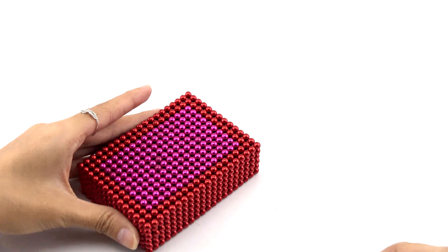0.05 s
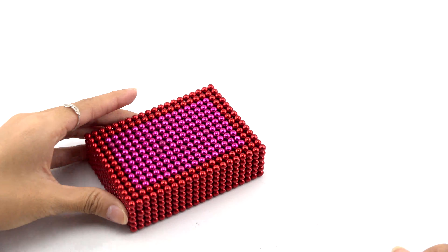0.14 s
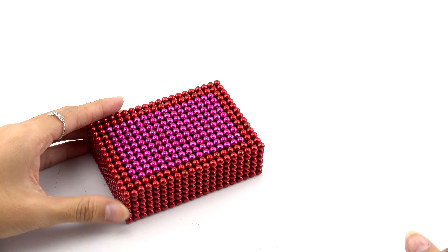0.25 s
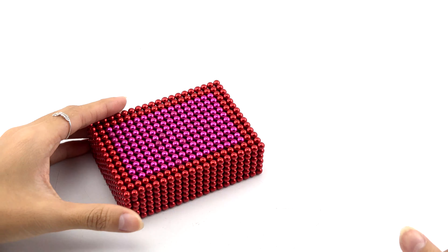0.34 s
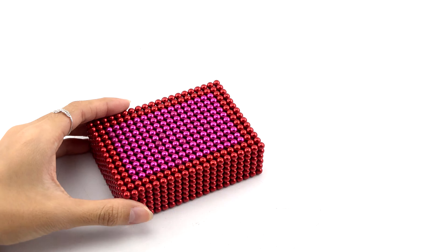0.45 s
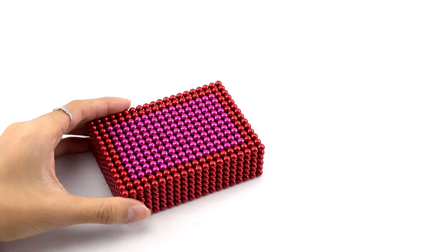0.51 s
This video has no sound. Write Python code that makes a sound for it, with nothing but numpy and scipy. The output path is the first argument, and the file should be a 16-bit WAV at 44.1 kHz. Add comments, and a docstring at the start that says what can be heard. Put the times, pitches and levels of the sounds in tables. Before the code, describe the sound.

Gritty sliding of many tiny steel magnets, then hard, bright clicks and dense snapping clatters, separated by quiet low room rumble.

```python
"""Magnet balls sliding and snapping

A hand slides a block of small steel magnet balls over a table: filtered contact noise plus a low table hum.
Then clusters of balls snap together as short ringing tones with a room tail, over rattling and rustling noise.
A small room rumbles as noise in narrow low modes, with faint air and whine; the loudest snaps overload the input.
"""
import sys
import numpy as np
from scipy import signal
from scipy.fft import rfft, irfft, next_fast_len
from scipy.io import wavfile
from scipy.ndimage import uniform_filter1d

SR = 44100
rng = np.random.default_rng(int(sys.argv[2]) if len(sys.argv) > 2 else 0)


def waveform_to_disk(signal):
    """Save audio, clipped to [-1, 1], as 16-bit WAV at the path in sys.argv[1]."""
    frames = np.transpose(np.atleast_2d(signal))
    scaled = np.clip(frames, -1, 1) * 32767
    samples = np.round(scaled).astype(np.int16)
    wavfile.write(sys.argv[1], SR, samples)


N = 257544

# single snaps of the cluster: start_s, clack_db, base_pitch_hz, upper_db and tick_db (both relative to the clack),
# base_ring_s (fall by 60 dB, scaled for each tone)
SNAPS = [(0.2947, -8.5, 1050, 0.5, -4.5, 0.0089), (0.2959, -3, 2550, -13, -7.5, 0.0057),
         (0.3358, -9, 1910, 2.5, -8.5, 0.0031), (0.5342, -7.5, 1700, -11, -15.5, .0048),
         (0.5658, -31, 2180, -4, 0, 0.0066), (0.6114, -25.5, 1690, -4, -14, .029),
         (0.6756, -43, 1950, 17.5, -19, 0.035), (1.251, -38, 1450, 14, 19.5, 0.061),
         (1.2591, -37.5, 1600, -7, 22.5, .015), (1.5218, -29, 1706, 11, -19.5, .012),
         (1.9209, -37.5, 2547, -6.5, -28.5, .0031), (2.208, -.5, 1544, -25.5, -70, 0.0058),
         (2.5839, -46.5, 1860, 3.5, 1.5, .0054), (2.6397, -41, 1580, -17, -26, .024),
         (2.657, -7.5, 1745, -12, -37, 0.014), (2.6716, -2.5, 1555, -6.5, -39, 0.023),
         (2.6799, -28.5, 1670, 7.5, -20, .036), (2.6959, 0.5, 2130, -15, -28, .015),
         (2.7227, -2.5, 1566, -13, -23, 0.02), (2.7282, 5.5, 2125, -17.5, -24, 0.0071),
         (2.733, -10, 2130, -11, -24, .012), (2.7685, -10, 2220, -18, -33.5, .013),
         (2.7761, -9, 1540, -4.5, -33, .058), (2.7796, 3.5, 2069, -22, -20, .012),
         (2.9471, -40, 2017, -14, -16.5, .0059), (2.9715, -27, 1530, -17.5, -30.5, .0042),
         (3.0078, -27, 1670, -14, -36, 0.015), (3.0308, -35.5, 1700, -9, -27.5, 0.018),
         (3.0548, -38.5, 1640, -19, -27.5, .024), (3.0864, -38, 1630, -16.5, -22.5, .005),
         (3.2227, -46.5, 1997, -8, -24, .009), (3.264, -36.5, 1630, -7, -16, 0.0049),
         (3.275, -29, 1940, -14.5, -27, 0.018), (3.2844, -2.5, 2470, -17, -34, 0.0041),
         (3.305, -18, 2000, -10.5, -21, 0.0054), (3.3109, -14.5, 2125, 0, -1.5, 0.037),
         (3.3163, 2, 2350, -4.5, -17, .006), (3.3512, -26.5, 2690, -5, -31, .017),
         (3.475, -42.5, 2550, -11, -29, 0.02), (3.5024, -29, 1090, -26.5, -19, .013),
         (3.5108, -29, 1141, -27, -27, .025), (3.99, -17, 2210, -14.5, -17.5, 0.0064),
         (3.992, -33, 1450, -4.5, -16, 0.022), (4.189, -21, 1350, -15, -18, 0.026),
         (4.1938, -19, 1275, -9.5, -15.5, .019), (4.2097, -13.5, 1075, 10, 3, 0.049),
         (4.222, -13, 1400, -1, -2.5, 0.056), (4.2399, -6.5, 1306, 7, -8.5, 0.031),
         (4.2605, -8.5, 1500, -11.5, -11.5, .027), (4.267, -5.5, 1535, -13, -21, .016),
         (4.563, -21, 1440, 12, -5, .03), (4.5696, -12.5, 1100, 10.5, 2, .015),
         (4.577, -10.5, 1290, -1.5, -11.5, 0.0033), (4.6043, -21, 1516, -3.5, -9.5, .012),
         (5.0863, -37, 997, -7, -5, .006), (5.6484, -15.5, 2651, -13.5, -44, .014),
         (5.6505, -23.5, 1350, -6, -49.5, .013), (5.7061, -42, 2455, 4.5, -29.5, .046)]


def gain_of(db):
    """Decibels to amplitude."""
    return 10 ** (np.asarray(db) / 20)


def evened(x):
    """Scales to rms 1."""
    return x / np.sqrt(np.mean(x ** 2) + 1e-20)


def peaked(x):
    """Scales to peak 1."""
    return x / np.abs(x).max()


def smoothed_noise(span):
    """Slow random curve, rms 1: noise averaged twice over a span in samples."""
    once = uniform_filter1d(rng.standard_normal(N), span)
    return evened(uniform_filter1d(once, span))


def read(points, hz):
    """Reads (frequency, value) points on a log-frequency axis."""
    f, value = np.transpose(points)
    return np.interp(np.log(hz + 1), np.log(f + 1), value)


def level(rows, order):
    """Gain curve from one dB column, fading out just beyond the rows."""
    s, db = np.asarray(rows)[:, 0], np.asarray(rows)[:, order]
    times = np.r_[s[0] - .004, s, s[-1] + .02]
    return gain_of(np.interp(np.arange(N) / SR, times, np.r_[-130, db, -130]))


def moves(rows, bend, pace):
    """One gain curve for each dB column: every row rises, holds and fades; bend above 1 rounds the shoulders."""
    rows = np.asarray(rows)
    t = np.arange(0, N + 16, 16) / SR  # a coarse grid is enough for slow curves
    s, rise, hold, fade = rows[:, :4, None].transpose(1, 0, 2)
    before = np.maximum(s - t, 0) / rise
    after = np.maximum(t - s - hold, 0) / fade
    curves = []
    for db, fade_factor in zip(rows[:, 4:].T, pace):
        shapes = gain_of(-60 * (before + after / fade_factor) ** bend)
        curves.append(np.interp(np.arange(N) / SR, t, gain_of(db) @ shapes))
    return curves


def coloured(x, points):
    """Shapes x by a spectrum, rms 1."""
    size = next_fast_len(N)
    shape = gain_of(read(points, np.fft.rfftfreq(size, 1 / SR)))
    return evened(irfft(rfft(x, size) * shape, size)[:N])


def band(x, hz, width, steady=0):
    """A resonance applied twice, rms 1; width is that of one pass in Hz, steady 0-1 evens out its swells."""
    pole = np.exp((2j * np.pi * hz - np.pi * width) / SR)
    z = signal.lfilter([1], [1, -2 * pole, pole ** 2], x + 1e-12)
    return evened((z / np.abs(z) ** steady).real)


def grains(per_s, spread_db, hiss, flutter_db):
    """Random tiny contacts of uneven size over a hiss, coming in clumps a few milliseconds long."""
    draw, size, sign = rng.random(N), rng.exponential(1, N), rng.standard_normal(N)
    clumps = gain_of(flutter_db * smoothed_noise(200))
    ticks = evened((draw < per_s / SR) * gain_of(spread_db * np.minimum(size, 4)) * sign)
    return clumps * (ticks + hiss * rng.standard_normal(N))


def stillness():
    """Faint air noise and a thin whine whose amplitude pulses at the buzz rate."""
    # air spectrum: frequency_hz, relative_level_db
    air_spectrum = [(160, -27), (280, -1.5), (420, -3.5), (551, -10), (1120, -9.5), (2060, -21.5),
                    (5600, -29), (9500, -34.5), (16000, -33)]
    air_db, whine_db = -68.5, -86  # air rms, whine carrier amplitude
    whine_hz, buzz_hz = 10002, 100
    t = np.arange(N) / SR
    whine = np.sin(2 * np.pi * whine_hz * t) * (1 + np.sin(2 * np.pi * buzz_hz * t))
    air = coloured(rng.standard_normal(N), air_spectrum)
    return gain_of(air_db) * air + gain_of(whine_db) * whine


def rumble():
    """Lumpy low noise gathered in the narrow modes of the room, with a few swells."""
    # low room sound over time: start_s, lowest_modes_db, middle_modes_db, upper_modes_db
    rumble_rows = [(0.0, -57, -45, -56.5), (0.21, -69, -30.5, -33.5), (0.31, -28.5, -32, -31),
                   (0.41, -49, -47.5, -64), (1.3, -59, -44.5, -62.5), (1.45, -51, -41, -43),
                   (1.76, -60, -53.5, -68.5), (2.15, -48.5, -56, -68), (2.23, -52, -40, -32),
                   (2.32, -67.5, -58.5, -62), (2.54, -60, -52, -66), (2.6, -29, -32.5, -59),
                   (2.67, -29.5, -24.5, -42), (4.03, -49.5, -36, -56.5), (4.2, -48, -30, -59),
                   (4.31, -53, -20, -35), (4.41, -66, -33.5, -58.5), (4.88, -42, -35.5, -71),
                   (5.02, -69, -27.5, -53.5), (5.32, -28.5, -30, -45.5), (5.82, -38, -30, -49),
                   (5.84, -40, -45, -46.5)]
    # room modes: pitch_hz, one_pass_width_hz, relative_level_db, rumble column that drives it
    mode_rows = [(26, 20, -12, 1), (58, 9, -2, 1), (117, 12, -3.5, 2), (151, 26, -5, 2), (236, 9, -4, 3),
                 (255, 50, -4, 3)]
    # swells: full_at_s, rise_s, hold_s, fade_s (60 dB each way), deep_sway_db, middle_modes_db
    sway_rows = [(.02, .1, 0.018, 0.16, -61, -35), (.31, .03, .02, .25, -36, -36),
                 (.73, 0.093, .03, .2, -70, -37), (.84, .1, 0.051, 0.28, -69, -36.5),
                 (1.24, .2, .04, 0.23, -75, -40), (2.4, .1, 0.028, 0.18, -70, -42.5),
                 (2.59, .03, 0.011, .2, -36.5, -40), (3.07, 0.11, 0.077, .3, -49.5, -29.5),
                 (3.55, .15, .1, .4, -48, -33), (4.6, .1, 0.027, .3, -55, -33),
                 (5.34, 0.21, .01, .12, -22, -45), (5.46, .15, .02, 0.16, -21, -39.5),
                 (5.61, .1, .01, .3, -32, -35.5), (5.78, 0.093, 0.025, .12, -50, -25)]
    lumps_db, lump_s = 2.2, .06  # rms unevenness, averaging span
    sway_hz, sway_width_hz = 26, 20

    deep, middle = moves(sway_rows, 1.3, [1, 1])
    drive = {order: level(rumble_rows, order) for order in (1, 2, 3)}
    drive[2] = drive[2] + middle
    out = deep * band(rng.standard_normal(N), sway_hz, sway_width_hz, 0.5)
    for hz, width, db, order in mode_rows:
        lumps = evened(gain_of(lumps_db * smoothed_noise(round(lump_s * SR))))
        out += gain_of(db) * drive[order] * lumps * band(rng.standard_normal(N), hz, width, 0.13)
    return out


def lingering():
    """A faint cluster of tones, narrow bands of noise, hangs on between the pushes."""
    # rings of the block: pitch_hz, one_pass_width_hz, relative_level_db
    block_rings = [(2465, 40, -9), (2747, 20, -3), (3001, 14, 0), (3091, 30, -3), (3430, 14, -1),
                   (3050, 600, -2)]
    # two stretches of ringing, each: start_s, level_db
    stretches = [
        [(0.34, -42), (0.426, -55.5), (0.52, -51), (0.535, -33)],
        [(0.96, -51), (0.988, -58), (1.118, -71), (1.17, -63)],
    ]
    tones = sum(gain_of(db) * band(rng.standard_normal(N), hz, width, .3) for hz, width, db in block_rings)
    return sum(level(rows, order=1) for rows in stretches) * evened(tones)


def pings():
    """Two faint metallic pings, each a pair of decaying sine tones."""
    # pings: start_s, level_db
    ping_rows = [(3.5, -73), (5.087, -68.5)]
    # tones of a ping: pitch_hz, relative_level_db, ring_s (fall by 60 dB)
    ping_tones = [(4560, -0.5, 0.57), (7860, 5.5, 0.42)]
    t = np.arange(N) / SR
    out = np.zeros(N)
    for s, db in ping_rows:
        for hz, tone_db, ring_s in ping_tones:
            decay = (t > s) * gain_of(db + tone_db - 60 * np.maximum(t - s, 0) / ring_s)
            out += decay * np.sin(2 * np.pi * hz * t)
    return out


def table_hum():
    """The table top's low modes under rubbing, as narrow noise bands, rms 1."""
    modes = [(374, 55, 1), (320, 150, 0.53), (492, 240, 0.32)]  # pitch_hz, one_pass_width_hz, relative amplitude
    return evened(sum(g * band(rng.standard_normal(N), hz, width, .3) for hz, width, g in modes))


def slides():
    """Many balls skate over the table top at once and shake it: contact noise in three colours over the hum."""
    # pushes of the block: full_at_s, rise_s, hold_s, base_fade_s (rise and fade span 60 dB),
    # low_rub_db, scrape_db, fizz_db, table_hum_db
    push_rows = [(.028, 0.18, 0.0071, 0.28, -35.5, -31.5, -44, -51.5),
                 (.18, .2, .055, .15, -31, -25, -33, -21), (.27, .08, .015, .1, -31, -30, -39, -36),
                 (.33, 0.088, 0.027, 0.13, -45, -51, -48, -55),
                 (.537, 0.0098, 0.0019, 0.057, -24.5, -26, -31.5, -44),
                 (.555, 0.035, 0.0035, 0.19, -36, -44.5, -42.5, -36.5),
                 (.7, 0.45, .02, .35, -49.5, -42, -78, -51.5),
                 (.85, 0.28, 0.068, 0.16, -50.5, -39.5, -49.5, -49.5),
                 (1.2, 0.12, 0.027, 0.27, -42, -54, -51, -55),
                 (1.253, 0.062, 0.016, 0.19, -34.5, -47, -32, -54.5),
                 (1.42, 0.29, .11, 0.22, -41, -32, -51, -42),
                 (1.533, 0.089, 0.0037, 0.14, -48, -44.5, -56, -29.5)]
    # factors on the fade length, one for each of the four layers
    push_pace = [1.01, 0.98, .85, 1.05]
    # spectra of rub, scrape and fizz: frequency_hz, relative_level_db
    rub_spectrum = [(320, -45), (550, -20.5), (704, -6.5), (1030, -17.5), (1260, -3.5), (1500, -2.5),
                    (1660, 1.5), (1750, 1.5), (2600, -9.5), (3380, -33.5), (5720, -120)]
    scrape_spectrum = [(1290, -45), (2200, -6.5), (2370, -5.5), (2770, -9), (2900, 2.5), (3320, 2),
                       (3890, -3), (4190, -11), (5600, -21), (7280, -28.5), (12300, -120)]
    fizz_spectrum = [(2650, -31.5), (4500, 0.5), (6010, -12), (6670, -12.5), (8200, -11), (9480, -15),
                     (10200, -23.5), (15500, -38.5)]

    low, high, bright, press = moves(push_rows, 1.284, push_pace)
    contacts = grains(3300, 1.2, 1.0, 1.0)
    rub = low * coloured(contacts, rub_spectrum)
    scrape = high * coloured(contacts, scrape_spectrum)
    fizz = bright * coloured(contacts, fizz_spectrum)
    return rub + scrape + fizz + press * table_hum()


def cluster_ring(x, width_hz):
    """The cluster resonates at the pitch of its latest snap until it is reshaped by the next; rms 1."""
    s, hz = np.asarray(SNAPS)[:, 0], np.asarray(SNAPS)[:, 2]
    latest = np.maximum(np.searchsorted(s, np.arange(N) / SR) - 1, 0)
    turn = np.exp(2j * np.pi * np.cumsum(hz[latest]) / SR)  # shifts the held pitch to 0 Hz and back
    r = np.exp(-np.pi * width_hz / SR)
    return evened((turn * signal.lfilter([1], [1, -2 * r, r * r], x / turn)).real)


def fingers():
    """Loose balls rattle in the hand while skin rustles over them and presses on the table."""
    # moves of the fingers: full_at_s, rise_s, hold_s, base_fade_s (rise and fade span 60 dB),
    # low_rattle_db, high_rattle_db, rustle_db, table_hum_db
    finger_rows = [(1.698, .02, .002, 0.17, -75, -66, -66, -79),
                   (1.826, .015, 0.0019, 0.19, -72, -58, -63.5, -75.5),
                   (1.922, .02, 0.0019, 0.17, -56.5, -63.5, -66, -83),
                   (2.14, 0.082, 0.0092, .2, -66, -70, -85, -74.5),
                   (2.211, .022, .002, .1, -32, -43.5, -64, -56), (2.23, .1, .005, .24, -46, -58, -72, -62),
                   (2.586, .01, .05, 0.11, -68, -76, -63.5, -62.5),
                   (2.66, .03, 0.048, 0.13, -27, -38, -62, -48),
                   (2.73, .05, 0.011, 0.16, -27, -35, -57, -43),
                   (2.785, .05, .015, 0.15, -28, -33, -60, -58), (2.975, .05, .02, .13, -48, -50, -73, -64),
                   (3.02, .08, .06, .1, -46, -62, -74, -70), (3.285, .05, .06, .14, -36, -32.5, -60, -52),
                   (3.32, 0.057, .002, .1, -36, -34, -39, -55),
                   (3.478, .012, 0.011, 0.11, -49, -58.5, -72, -52),
                   (3.51, 0.073, 0.028, 0.14, -47.5, -67, -72, -53),
                   (3.84, 0.091, .02, 0.49, -68, -47.5, -53.5, -65),
                   (3.91, .15, .02, .15, -62.5, -60.5, -69.5, -56),
                   (3.995, 0.037, 0.015, 0.12, -46.5, -52.5, -62, -80),
                   (4.16, 0.11, 0.011, .2, -52, -56, -75, -60),
                   (4.2, 0.069, 0.025, 0.17, -25.5, -29.5, -32, -42),
                   (4.25, 0.067, 0.024, .22, -26, -26.5, -34, -33),
                   (4.33, .1, .03, .15, -48, -42, -65, -55), (4.566, 0.039, .01, .12, -25, -33, -30, -45),
                   (4.6, .08, .01, .2, -36, -40, -42, -55), (4.92, .2, .05, .13, -60.5, -73, -70, -84),
                   (5.09, .012, .1, 1.3, -72, -76, -63, -57),
                   (5.652, .02, 0.0018, 0.11, -31, -37.5, -95, -47.5),
                   (5.68, .12, 0.063, .1, -55, -54, -91, -58), (5.76, .1, 0.046, .1, -80, -85.5, -91, -46)]
    # factors on the fade length, one for each of the four layers
    finger_pace = [1.09, 1.03, .85, 0.77]
    # spectra of low rattle, high rattle and rustle: frequency_hz, relative_level_db
    rattle_spectrum = [(290, -47), (500, -15), (904, -13), (957, -8.5), (1540, -2.5), (1740, -2),
                       (2200, -7.5), (2700, -12), (3510, -43.5), (5940, -120)]
    chatter_spectrum = [(1410, -33.5), (2400, -9.5), (2540, -5.5), (3250, 6.5), (3820, 2), (4180, -10.5),
                        (5000, -12), (6500, -50.5), (11000, -120)]
    rustle_spectrum = [(2350, -27.5), (4000, -6), (4190, -5), (5070, -11.5), (7140, -10.5), (9120, -13),
                       (13700, -16.5), (16000, -26.5)]
    bend = 1.2
    treble_hz, treble_pace = 7500, .55  # the top of the rustle dies sooner

    low, high, bright, press = moves(finger_rows, bend, finger_pace)
    treble = moves(finger_rows, bend, np.full(4, treble_pace))[2]
    contacts = grains(1400, 1.0, 1.0, 1.9)
    rattle = 0.94 * coloured(contacts, rattle_spectrum) + 0.38 * cluster_ring(contacts, 540)
    chatter = coloured(contacts, chatter_spectrum)
    rustle = coloured(grains(2500, 1.5, 1.4, 0.91), rustle_spectrum)
    dull = signal.sosfiltfilt(signal.butter(2, treble_hz, fs=SR, output="sos"), rustle)
    skin = bright * dull + treble * (rustle - dull)
    return low * rattle + high * chatter + skin + press * table_hum()


def knock(db, hz):
    """The table top thuds as decaying sines; the spot struck favours nearby modes."""
    # table top modes: pitch_hz, ring_s (fall by 60 dB)
    table_modes = [(245, 0.089), (390, 0.039), (520, 0.043), (620, 0.037), (740, 0.03)]
    t = np.arange(6000) / SR
    thud = np.zeros(len(t))
    for f, ring_s in table_modes:
        favour_db = -25 * abs(np.log2(f / hz))  # 25 dB weaker for each octave away
        thud += gain_of(favour_db - 60 * t / ring_s) * np.sin(2 * np.pi * f * t)
    return gain_of(db) * peaked(thud * (1 - np.exp(-t / 0.016)))


def snap(db, hz, upper_db, tick_db, t60):
    """One ball lands, neighbours follow within milliseconds, and the cluster rings briefly."""
    # clack tones: pitch_factor, relative_level_db, ring_factor
    clack_tones = [(.7, -17, 0.77), (0.849, -10.5, 1.1), (1.0, 12.5, 0.83), (1.15, -4, 0.99),
                   (1.4, -13.5, 1.3)]
    # upper ring: base_pitch_hz, relative_level_db (both with a random spread)
    upper_tones = [(2750, -2), (3070, 0.5), (3300, 1), (3550, 2.5), (3810, 1.5), (4400, -7)]
    t = np.arange(6000) / SR
    luck = rng.standard_normal((3, 12))
    blow = (rng.random(len(t)) < .015) * rng.standard_normal(len(t)) * 0.33 * gain_of(-60 * t / .03)
    blow[0] = 1
    rise = (1 - np.exp(-t / .00022)) ** 2  # the push spreads through the cluster: no hard edge

    def ring(f, ring_s):
        """A decaying sine with the soft rise."""
        return rise * gain_of(-60 * t / ring_s) * np.sin(2 * np.pi * f * t)

    def struck(tones):
        """Repeats the tones at every blow, peak 1."""
        return peaked(signal.oaconvolve(tones, blow)[:len(t)])

    clack = sum(gain_of(g) * ring(hz * k * (1 + 0.0093 * u), t60 * d)
                for (k, g, d), u in zip(clack_tones, luck[0]))
    upper = sum(gain_of(g + 2 * v) * ring(f * (1 + .03 * u), 0.65 * t60)
                for (f, g), u, v in zip(upper_tones, luck[1], luck[2]))
    crack = rng.standard_normal(len(t)) * rise * gain_of(-60 * t / 0.014)
    tick = signal.sosfilt(signal.butter(2, [4800, 9500], "band", fs=SR, output="sos"), crack)
    body = struck(clack) + gain_of(upper_db) * struck(upper)
    # the contact lasts too long to push higher
    body = signal.sosfilt(signal.butter(5, 4900, fs=SR, output="sos"), body)
    return gain_of(db) * (body + gain_of(tick_db) * peaked(tick))


def snaps():
    """All single snaps and knocks at their moments."""
    # knocks on the table top: start_s, level_db, pitch_hz of the spot struck
    knock_rows = [(0.2947, -22, 570), (0.3358, -33, 620), (0.5342, -24.5, 516), (0.5658, -35, 550),
                  (0.6114, -35, 540), (1.252, -37, 605), (1.5218, -20.5, 677), (2.208, -25.5, 240),
                  (2.6716, -33.5, 259), (2.7227, -32, 251), (3.305, -26.5, 666), (3.5024, -41.5, 760),
                  (4.1938, -23, 740), (4.2097, -24, 400), (4.2399, -23.5, 370), (4.267, -22.5, 718),
                  (4.563, -27.5, 800), (4.577, -28, 406), (5.0863, -40, 220), (5.6505, -46.5, 617)]
    out = np.zeros(N + 6000)
    for rows, source in ((SNAPS, snap), (knock_rows, knock)):
        for s, *row in rows:
            sound = source(*row)
            out[round(s * SR):][:len(sound)] += sound
    return out[:N]


def room(x):
    """Dense reflections as decaying noise, each band dying at its own speed."""
    # room decay: frequency_hz, ring_s (fall by 60 dB)
    decay_times = [(250, 0.17), (700, 0.31), (1700, 0.069), (4600, 0.18), (12000, 0.072)]
    hz, t, z = signal.stft(rng.standard_normal(SR // 2), SR, nperseg=128)
    decay = gain_of(-60 * t / read(decay_times, hz)[:, None])
    tail = signal.istft(z * decay, SR, nperseg=128)[1]
    tail *= 1 - np.exp(-np.arange(len(tail)) / SR / 0.00092)
    return signal.oaconvolve(x, tail / np.linalg.norm(tail))[:N]


def scene():
    """Snaps with their room tail over the handling and the room's own sound."""
    hits = snaps()
    wet_hits = hits + gain_of(-11.5) * room(hits)
    handling = slides() + lingering() + fingers() + pings()
    return (wet_hits + handling + rumble() + stillness())[None]


def record(dry):
    """The input clips at full scale; then a low-pass limits the band."""
    edge_hz = 16200
    low_pass = signal.firwin(511, edge_hz, window=("kaiser", 9), fs=SR)
    return signal.oaconvolve(np.clip(dry, -1, 1), low_pass[None], "same")


dry = scene()
out = record(dry)
waveform_to_disk(out)
```